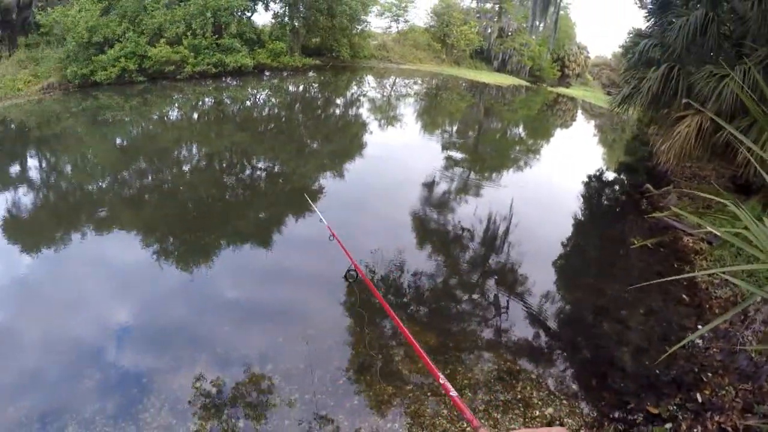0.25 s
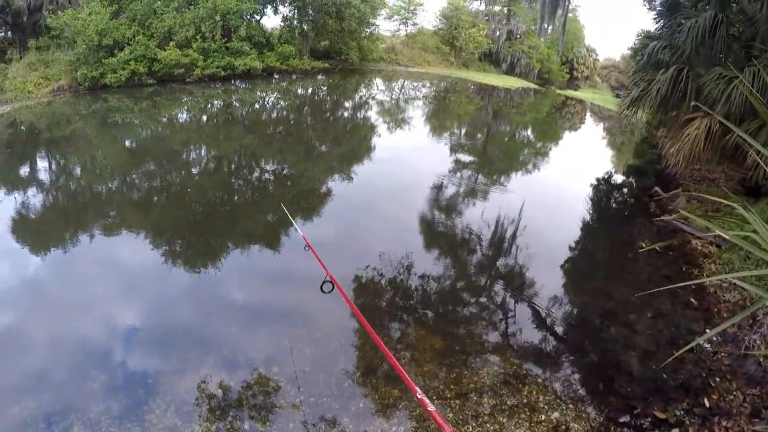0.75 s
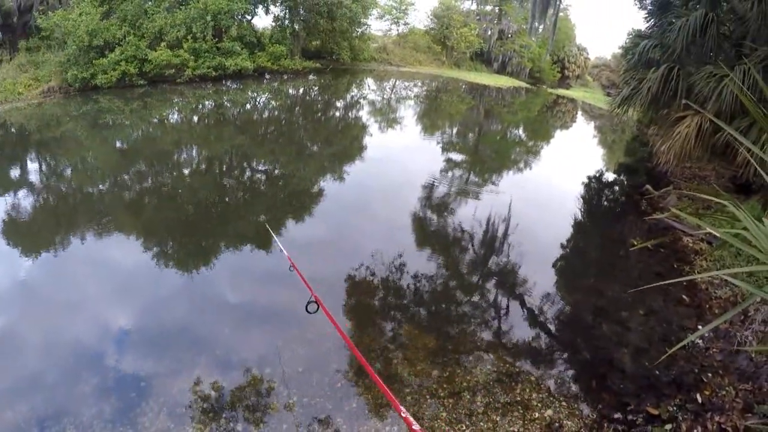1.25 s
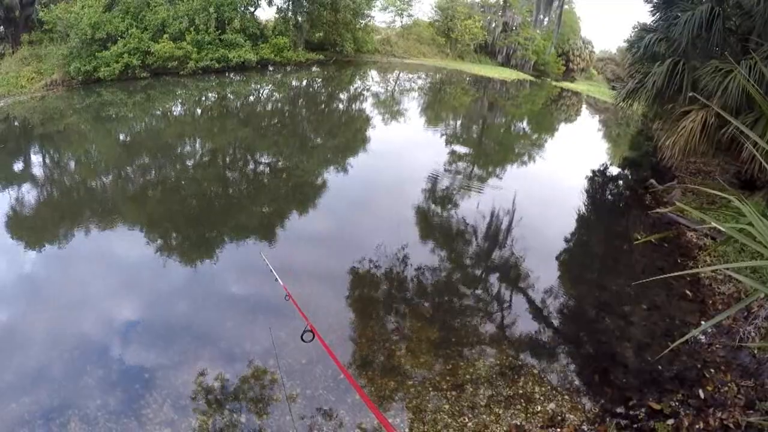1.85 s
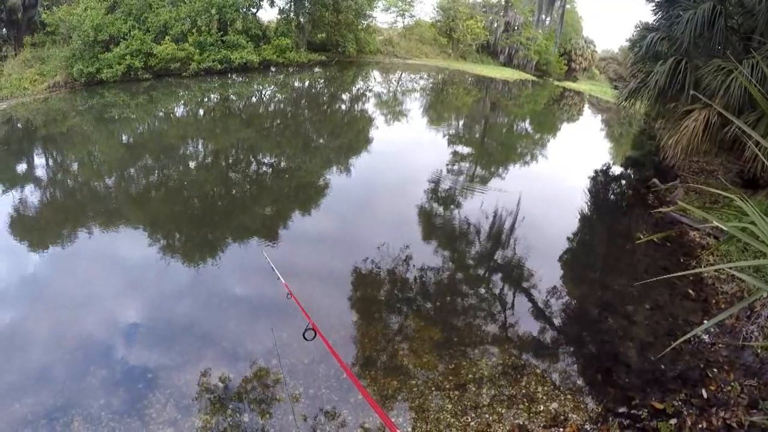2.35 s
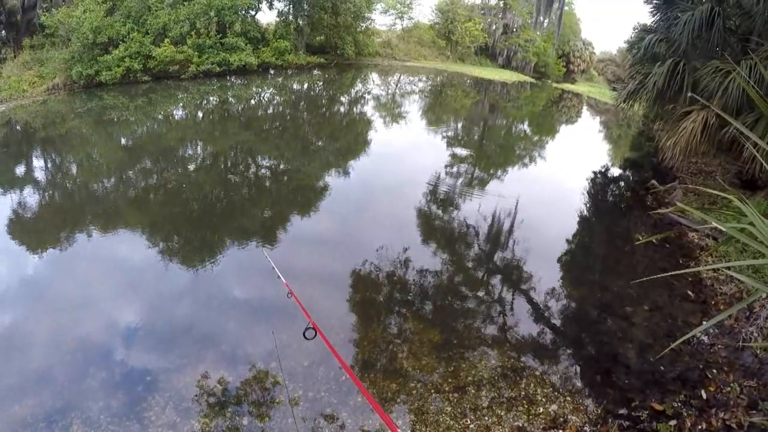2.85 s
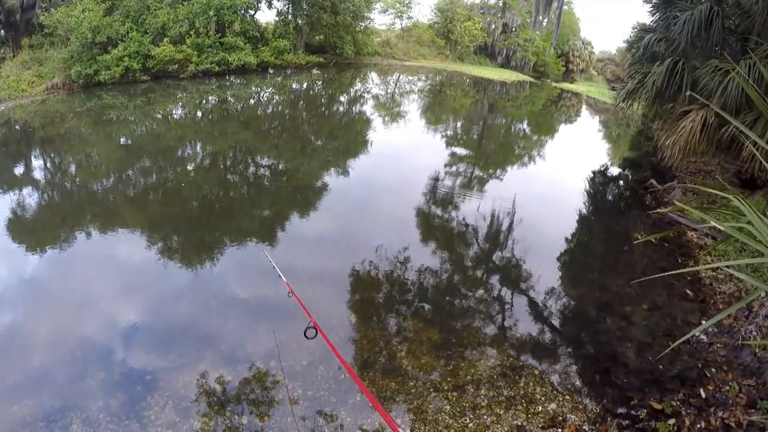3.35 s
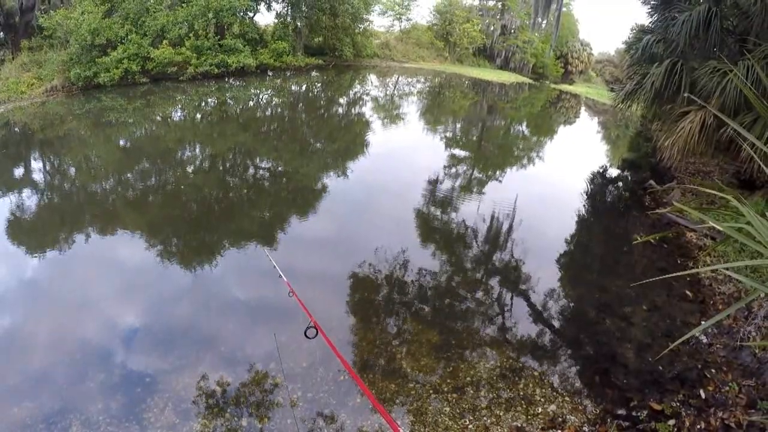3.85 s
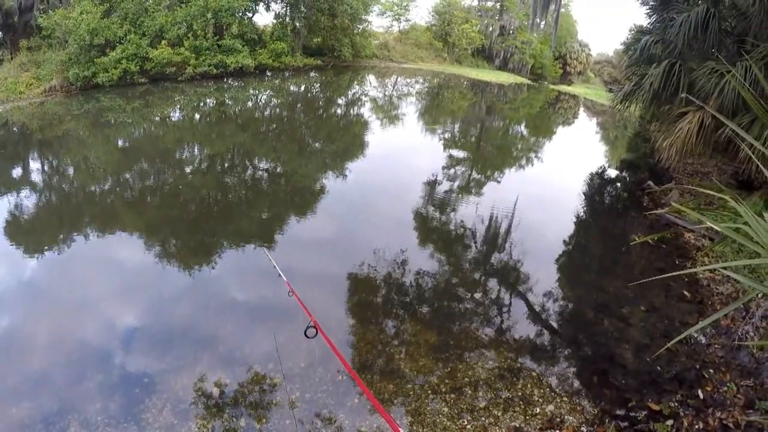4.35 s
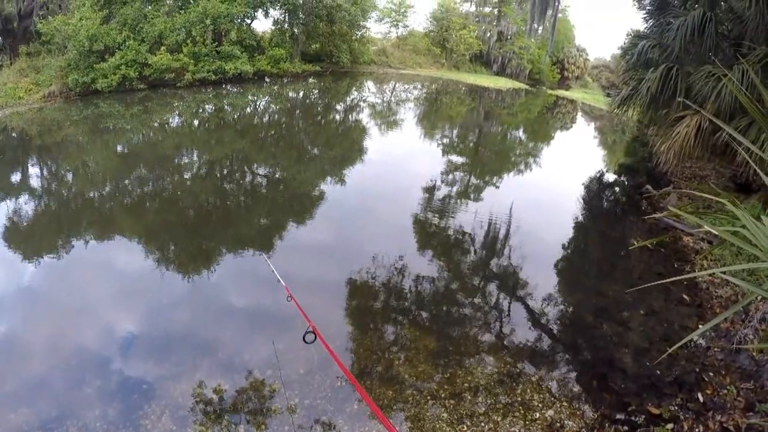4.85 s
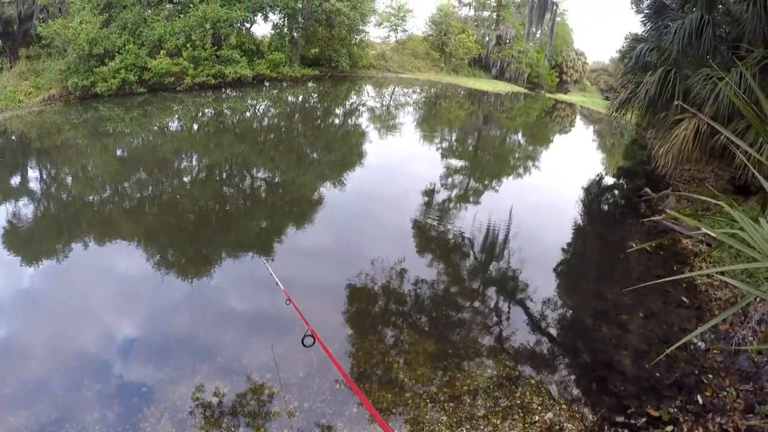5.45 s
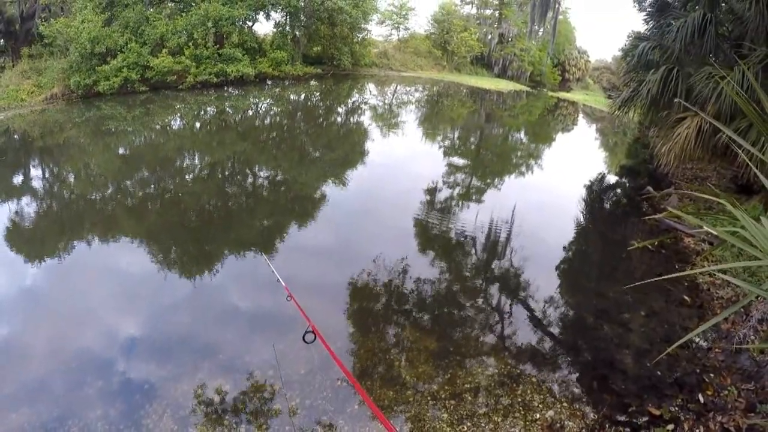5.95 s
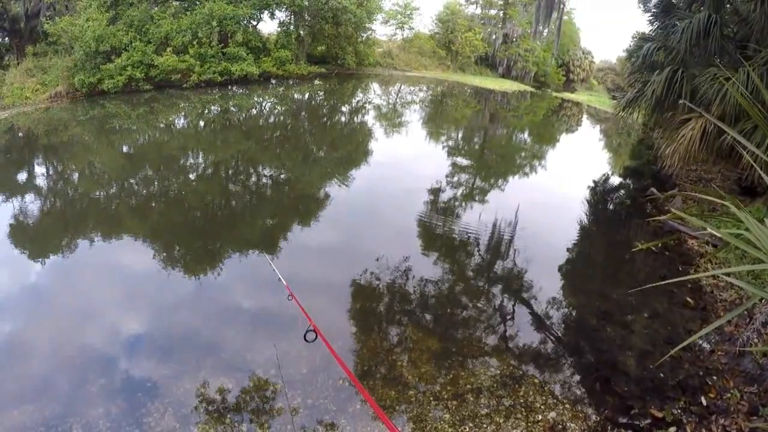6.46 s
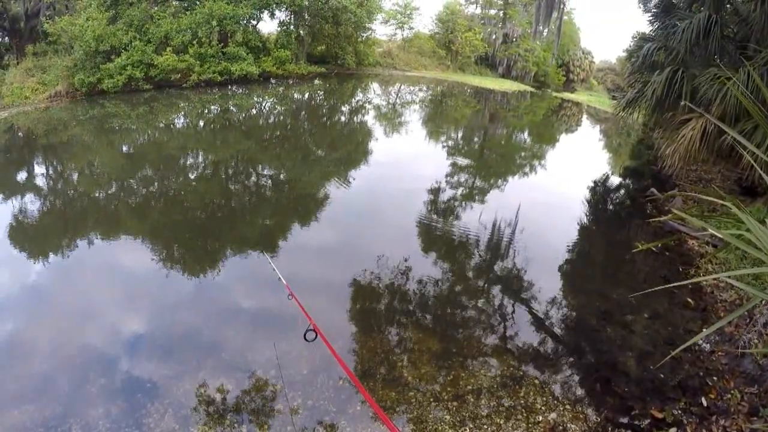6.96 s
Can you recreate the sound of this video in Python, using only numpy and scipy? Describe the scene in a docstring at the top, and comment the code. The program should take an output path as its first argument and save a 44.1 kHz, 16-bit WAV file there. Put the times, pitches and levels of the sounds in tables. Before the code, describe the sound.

A calm pond bank, heard from one fixed point in the open. Throughout, distant traffic makes a deep, soft rumble and a dull, steady tyre rush, with a very faint hiss above. Fine, shrill crickets trill continuously, a few standing out of a blurred far chorus. At about 0.15 s the fishing rod makes a small, dry, hollow tick, with much fainter ticks just before it and at 0.8 s. Far birds warble dimly as echoes from 0.55 to 1.1 s and again, lower, from 4.6 to 5.2 s. A small bird gives a faint, very high chip at 3.3 s and a clearer one at 4.5 s. From 5 s a distant engine's low hum rises over almost a second and stays, its roar nearest around 5.8 s. Between 6.05 and 6.7 s the bird whistles six quick notes stepping downward, the last two fainter and fluttering, with short woodland echoes.

```python
"""Distant traffic rumbles and rushes under a steady chorus of trilling crickets at a still pond among trees.
A fishing rod ticks in the hand, and far birds warble faintly, heard only as echoes.
A small bird gives two high calls, then a falling run of whistles, which the trees throw back.
Filtered noise makes the traffic, hiss and far crickets; gliding sine tones make the near crickets and birds.
Sines make the engine's hum, dying sines the rod, and scattered random echoes the trees."""
import sys
import numpy as np
from scipy import signal
from scipy.fft import rfft, irfft, next_fast_len
from scipy.io import wavfile

SR = 44100
rng = np.random.default_rng(int(sys.argv[2]) if len(sys.argv) > 2 else 0)


def store_pcm(level_fs):
    """Save levels as 16-bit WAV."""
    pcm = np.round(np.clip(level_fs, -1, 1) * 32767).astype(np.int16)
    wavfile.write(sys.argv[1], SR, np.atleast_2d(pcm).T)


N = 317961  # length in samples
TIME = np.arange(N) / SR  # seconds


def gain_of(db):
    """Turns decibels into a gain."""
    return 10 ** (np.asarray(db) / 20)


def evened(x):
    """Scales a sound to an rms of 1."""
    return x / np.sqrt(np.mean(x ** 2) + 1e-20)


def add(mix, start_s, sound):
    """Mixes a sound in at its start time."""
    part = mix[max(round(start_s * SR), 0):][:len(sound)]
    part += sound[:len(part)]


def noise(spectrum):
    """Random noise of rms 1, shaped to a spectrum of (Hz, dB) points."""
    size = next_fast_len(N)
    hz, db = np.transpose(spectrum)
    f = np.fft.rfftfreq(size, 1 / SR) + 1e-3
    # fade out below the first point and above the last
    outside = np.minimum(f / hz[0], 1) * np.minimum(hz[-1] / f, 1)
    gain = gain_of(np.interp(np.log(f), np.log(hz), db)) * outside ** 2
    white = rng.standard_normal(size)
    return evened(irfft(rfft(white) * gain, size)[:N])


def drift(per_s):
    """Random wander of rms 1: straight lines between per_s random values each second."""
    knots = np.arange(0, TIME[-1] + 2 / per_s, 1 / per_s)
    values = rng.standard_normal(N)[:len(knots)]
    return evened(np.interp(TIME, knots, values))


def trees(x, t60, first_s):
    """Scattered echoes from trunks and leaves, dying by 60 dB in t60 seconds."""
    t = TIME[:SR]
    # about 2000 echoes a second, at random times
    echoes = rng.standard_normal(SR) * (rng.random(SR) < 2000 / SR)
    echoes *= gain_of(-60 * t / t60) * (t > first_s)
    return signal.fftconvolve(x, echoes / np.linalg.norm(echoes))[:N]


# The tone colour of the faint hiss.
# Each row: frequency in Hz, relative strength in dB per Hz.
HISS = [(1000, 4.5), (2500, 0.5), (3800, 0.5), (5600, -2.5), (7500, -6), (10000, -8), (15000, -12)]


def air():
    """A faint, steady hiss of shaped noise."""
    return gain_of(-73.0) * noise(HISS)


# The tone colours of the traffic's rumble, the rush of tyres and the engine's roar.
# Each row: frequency in Hz, relative strength in dB per Hz.
RUMBLE = [(10, -15.5), (26, -1), (42, 0.5), (72, 1), (97, -5.5), (125, -6.5), (170, -13.5), (230, -17),
          (300, -26.5), (500, -40)]
RUSH = [(120, -17), (300, -2), (480, -2.5), (700, -1.5), (880, 0.5), (1100, -4.5), (1350, -6.5),
        (1700, -13), (2200, -20), (3000, -29), (5000, -44.5)]
MOTOR = [(90, -26), (125, -9.5), (185, 0.5), (222, -4), (265, -14), (400, -32.5)]
# The tones in the engine's hum.
# Each row: multiple of the firing rate, average level in dB relative to the other tones.
HUM = [(2, -2.5), (3, -5.5), (4, -17.5)]
# How loud the tyre rush is over time.
# Each row: time in seconds, level in dB before a small lift and wander.
TYRES = [(0.25, -50.5), (0.36, -52), (1.94, -51), (2.79, -51.5), (3.46, -51), (7.0, -52)]
FIRING_HZ = 56.83  # average firing rate of the engine
# when the engine is nearest, and the time it takes to travel its own distance from us
NEAREST_S, PASS_S = 5.77, 1.35
# when the engine starts to pull, how long its hum takes to rise, and the hum before and after
PULL_S, PULL_RISE_S, COAST_DB, PULL_DB = 5.0, .8, -68.5, -48.5


def traffic():
    """Far roads: deep rumble, the rush of tyres and one engine that draws closer and starts to pull."""
    rumble = gain_of(-40) * noise(RUMBLE)

    # the roar weakens with distance as the engine passes
    nearness = 1 / np.hypot(1, (TIME - NEAREST_S) / PASS_S)
    roar = nearness * gain_of(-52) * noise(MOTOR)

    # the hum's tones share one slightly unsteady firing rate
    firings = np.cumsum(FIRING_HZ * (1 + 0.00611 * drift(per_s=5))) / SR
    tones = np.zeros(N)
    for multiple, db in HUM:
        level = gain_of(db + 2.0 * drift(per_s=4))
        tones += level * np.sin(2 * np.pi * (multiple * firings + rng.random()))
    pull = np.clip((TIME - PULL_S) / PULL_RISE_S, 0, 1)
    hum = gain_of(COAST_DB + (PULL_DB - COAST_DB) * pull) * evened(tones)

    rush_db = np.interp(TIME, *np.transpose(TYRES))
    rush = gain_of(rush_db + 0.55 + 0.3 * drift(per_s=7)) * noise(RUSH)
    return rumble + roar + hum + rush


def cricket(hz, strokes_per_s, db, closing=.52, sag_hz=260, waver_hz=45):
    """Each closing of the wings scrapes a short tone that sags in pitch as the file slows."""
    stroke = np.cumsum(strokes_per_s * (1 + .012 * drift(per_s=4))) / SR % 1
    # the wings sound only while closing, the first part of each stroke
    along = np.minimum(stroke / closing, 1)
    pitch = hz + sag_hz * (.5 - along) + waver_hz * drift(per_s=120)
    tone = np.sin(np.pi * along) * np.sin(2 * np.pi * np.cumsum(pitch) / SR)
    return gain_of(db + 0.55 * drift(per_s=20)) * evened(tone)


# The nearer crickets.
# Each row: average wing pitch in Hz, average wing strokes per second,
# level in dB before the direct and echo levels below and a small wander.
CRICKETS = [(4746, 30, -79.5), (4734, 84.3, -82.5), (4820, 77.3, -83)]
# The tone colour of the far crickets.
# Each row: frequency in Hz, relative strength in dB per Hz.
CHORUS = [(4100, -30), (4350, -7.5), (4550, -0.5), (4730, -3), (4920, -1), (5100, -8.5), (5400, -20)]


def insects():
    """A few crickets stand out of a far chorus that has blurred into one band of noise."""
    near = sum(cricket(*row) for row in CRICKETS)
    direct = gain_of(-2.0) * near
    echo = gain_of(-8.5) * trees(near, t60=.4, first_s=0.0078)
    far = gain_of(-76.0 + .5 * drift(per_s=6)) * noise(CHORUS)
    return direct + echo + far


# The far birds, one phrase a row.
# Each row: start in seconds, length in seconds, middle pitch in Hz, typical pitch swing in Hz,
# random pitch turns per second, level in dB before the echoes.
FAR_BIRDS = [(0.549, 0.28, 3930, 318, 111, -77.5), (.85, 0.22, 4020, 119, 58.7, -83),
             (4.624, .55, 2990, 60, 39.6, -82), (5.193, .05, 2920, 50, 60, -77)]


def far_birds():
    """Phrases with a randomly warbling pitch, heard only as echoes among the trees."""
    song = np.zeros(N)
    for start_s, length_s, hz, swing_hz, turns_per_s, db in FAR_BIRDS:
        pitch = hz + swing_hz * drift(turns_per_s)[:int(length_s * SR)]
        fade = signal.windows.tukey(len(pitch), .5)
        tone = np.sin(2 * np.pi * np.cumsum(pitch) / SR) * fade
        add(song, start_s, gain_of(db) * evened(tone))
    return trees(song, t60=0.63, first_s=0.0054)


# The ticks of the rod.
# Each row: start in seconds, level in dB, brightness in dB per octave above the lowest ringing tone.
TICKS = [(.044, -66, 3), (.155, -49.5, -6), (0.783, -66.5, 3)]
# The tones at which the rod rings.
# Each row: frequency in Hz, level in dB relative to the tick, time in seconds to die by 60 dB.
ROD = [(1580, 3, .025), (1950, 2, 0.017), (2370, -1, .018), (2750, -2, 0.016), (3720, -2, 0.011),
       (6270, -8, .014)]


def rod():
    """Light knocks ring the rod's own tones, which die away quickly."""
    out, t = np.zeros(N), TIME[:SR // 10]
    for start_s, db, bright_db in TICKS:
        for k, (hz, mode_db, t60) in enumerate(ROD):
            level_db = db + mode_db + bright_db * np.log2(hz / ROD[0][0])
            ring = gain_of(level_db - 60 * t / t60) * np.sin(2 * np.pi * hz * t)
            add(out, start_s, (-1) ** k * ring)  # every other tone is flipped
    return out


ATTACK_S, RELEASE_S = 0.0084, 0.0068  # fade in and fade out of a whistled note
GLIDE_S = .009  # how quickly a note reaches its pitch and leaves it, before its lean


def whistle(length_s, hz, scoop_hz, fall_hz, lean, db, swell_db, flutter):
    """One nearly pure tone that glides to its pitch, holds it and may fall away."""
    t = np.arange(0, length_s, 1 / SR)
    scoop = scoop_hz * np.exp(-t / (GLIDE_S * lean))
    fall = fall_hz * np.exp((t - length_s) / (GLIDE_S / lean))
    pitch = (hz - scoop - fall) * (1 + flutter * drift(per_s=400)[:len(t)])
    gate = np.clip(np.minimum(t / ATTACK_S, (length_s - t) / RELEASE_S), 0, 1)
    level = gate * gain_of(db + swell_db * (t / length_s - .5))
    return np.sqrt(2) * level * np.sin(2 * np.pi * np.cumsum(pitch) / SR)


# The near bird, one note a row; the faint, fluttering notes are heard mostly as echo.
# Each row: start in seconds, length in seconds, held pitch in Hz, scoop up to it in Hz,
# fall at the end in Hz, lean (over 1 is a slow scoop and quick fall), level in dB mid-note,
# swell over the note in dB, flutter as a share of the pitch, extra level of the direct sound in dB.
NOTES = [ (3.321, .036, 7850, 800, 750, 1.1, -67.5, 0, .026, -9),
         (4.475, .028, 7500, 2100, 0, .55, -61, -6, .004, -0.5),
         (6.054, 0.08, 8530, 500, 1000, 1.35, -66.5, 10, 0.0043, -4),
         (6.195, .077, 8170, 898.5, 2200, 1.3, -64, 4, .01, -1),
         (6.320, .067, 6490, 1500, 950, .35, -60.5, 7, .012, -1.5),
         (6.428, .040, 5850, -3, 2100, .65, -59, 5, .01, -2),
         (6.500, .102, 4330, 900, 1150, 1.14, -68, 2, .025, -5),
         (6.63, .088, 4320, 1000, 1100, 1.3, -68, -1, 0.037, -6), ]


def near_bird():
    """Whistles with quick echoes from nearby leaves and a longer tail from the bank."""
    song, direct = np.zeros(N), np.zeros(N)
    for start_s, *shape, direct_db in NOTES:
        note = whistle(*shape)
        add(song, start_s, note)
        add(direct, start_s, gain_of(direct_db) * note)
    leaves = gain_of(-6.0) * trees(song, t60=0.11, first_s=.002)
    bank = gain_of(-8) * trees(song, t60=0.54, first_s=0.013)
    return direct + leaves + bank


def scene():
    """Adds every sound together at one listening point on the bank."""
    background = air() + traffic() + insects()
    return (background + far_birds() + rod() + near_bird())[None]


EDGE_HZ = 15200  # the treble is cut above this


def record(dry):
    """A low-pass filter takes away the highest treble."""
    low_pass = signal.firwin(511, EDGE_HZ, window=("kaiser", 9), fs=SR)
    return signal.oaconvolve(dry, low_pass[None], "same")


dry = scene()
out = record(dry)
store_pcm(out)
```